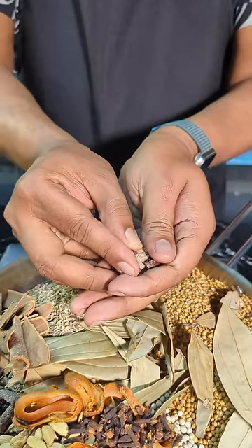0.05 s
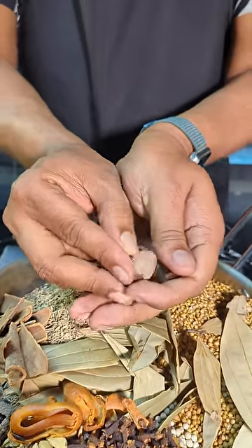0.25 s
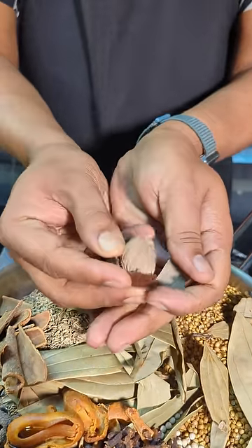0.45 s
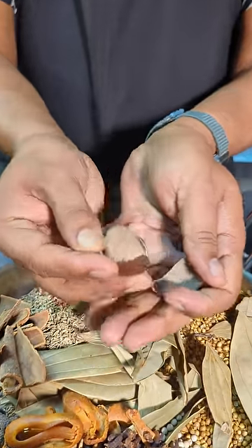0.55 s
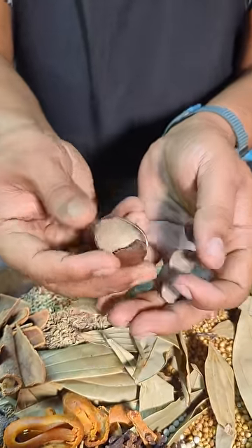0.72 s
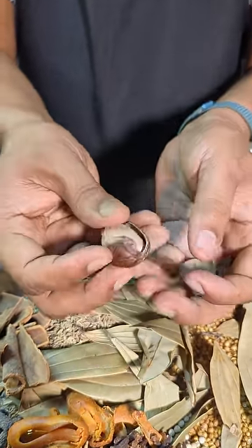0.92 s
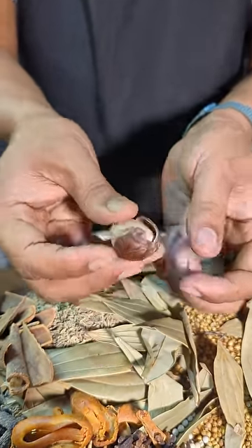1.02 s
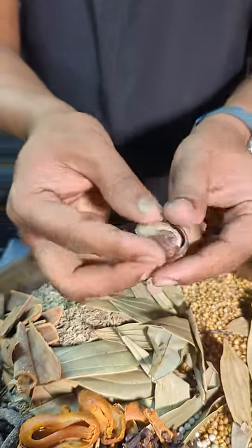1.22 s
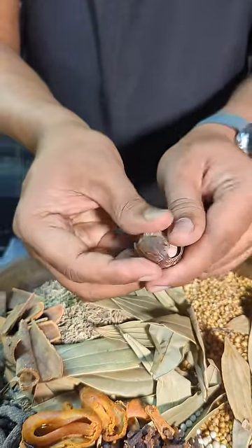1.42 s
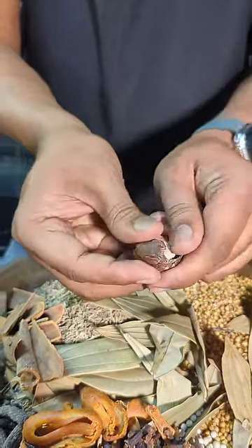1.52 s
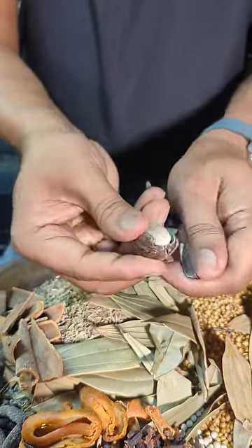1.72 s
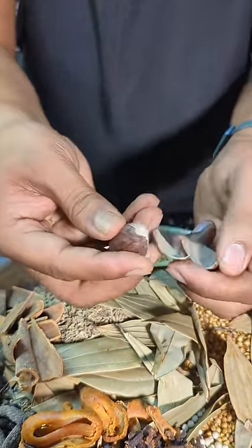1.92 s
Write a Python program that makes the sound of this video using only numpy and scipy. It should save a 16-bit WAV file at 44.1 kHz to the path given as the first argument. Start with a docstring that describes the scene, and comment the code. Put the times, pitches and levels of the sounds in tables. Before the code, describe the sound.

Fingers snap the hard shell off a nutmeg, close up, over a faint machine hum.

```python
"""Fingers break the brittle shell off a nutmeg, close to a stereo microphone in a quiet room.
Each fracture is an impulse with a short run of micro-cracks that excites the resonances of the shell.
Between fractures the pieces rub, nails tick and fingers bump. The room reverberates briefly,
the first break jolts the right microphone port, and a machine hums and rumbles behind."""
import sys
import numpy as np
from scipy import signal
from scipy.fft import rfft, irfft, next_fast_len
from scipy.io import wavfile

SR = 44100
rng = np.random.default_rng(int(sys.argv[2]) if len(sys.argv) > 2 else 0)


def materialize(psi):
    """Save the field psi as 16-bit PCM at rate SR to the path in sys.argv[1].

    A 1-D psi becomes a single channel; in a 2-D psi each row is a channel.
    """
    bounded = np.clip(np.atleast_2d(psi).T, -1, 1)
    quanta = np.round(bounded * 32767).astype(np.int16)
    wavfile.write(sys.argv[1], SR, quanta)


N = 85995

# spectrum of the air noise: f/Hz, relative level/dB
AIR_SPECTRUM = [(120, 1), (200, 2.5), (245, -6.5), (360, -8), (740, -17), (1190, -18), (1560, -13.5),
                (1800, -19), (1980, -8), (2250, -19), (3460, -20.5), (4120, -23.5), (6140, -26.5),
                (7300, -25.5), (9000, -32)]
# its treble roll-off: f/Hz, gain/dB
AIR_ROLL_OFF = [(8500, 1), (10500, 1), (12500, -5), (16000, -10)]
# resonances of the machine: f/Hz, half width/Hz, level/dB
MACHINE_MODES = [(1551, 99, -59), (1980, 29, -63), (7330, 580, -63.5)]
# partials of the hum: f/Hz, level/dB
HUM_PARTIALS = [(49.8, -36), (149.4, -49), (249.7, -60.5), (299.8, -63.5)]
# envelope of air noise, machine resonances and hum: t/s, gain/dB
AIR_ENVELOPE = [(0, 1), (.23, 0.5), (.27, -9), (.5, -0.5), (1.48, 2), (1.7, -12.5), (1.95, 1)]
# spectrum of the rumble: f/Hz, relative level/dB
RUMBLE_SPECTRUM = [(10, -3), (25, 3.5), (38, 2), (52, 1.5), (62, -13.5), (100, -11.5), (185, -14.5),
                   (240, -30.5), (420, -40), (1000, -53), (4000, -100)]
# envelope of the rumble: t/s, level/dB
RUMBLE_ENVELOPE = [(0, -35), (.7, -34.5), (.8, -30.5), (1.1, -29), (1.45, -33.5), (1.64, -38), (1.7, -52),
                   (1.85, -33.5), (1.95, -46)]
# faint whistles: onset t/s, duration/s, f/Hz, level/dB
WHISTLE_NOTES = [(0.037, 0.0074, 3450, -47), (0.09, .08, 3330, -56), (0.461, 0.17, 2960, -52.5)]
# balance of the background: f/Hz, left minus right/dB
BACKGROUND_BALANCE = [(50, -1.5), (1000, -0.5), (3000, -2.5), (9000, 3.5), (15000, -2)]
# likeness of noise at the two ports: f/Hz, correlation
COHERENCE = [(30, 0.97), (150, 1), (400, 0.86), (1000, 0.72), (2000, 0.41), (5000, 0), (15000, 0.0094)]
# reverberation time: f/Hz, T60/s
ROOM_DECAY = [(300, 0.61), (3000, 0.49), (8000, 0.47), (15000, 0.28)]
# initial spectrum of the reverberation: f/Hz, relative level/dB
ROOM_SPECTRUM = [(300, 12), (1500, 0.5), (3000, 1.5), (4500, 1), (6500, -2.5), (8800, 1), (12000, -6),
                 (16000, 7)]
# air pushed onto the right port: onset t/s, level/dB, time constant/s, corner f/Hz
PORT_PUFF = (-0.53, -36.5, 0.38, 370)
# jolt of the right port: t/s, amplitude, f/Hz, time constant/s
PORT_KNOCK = (.2452, 0.88, 6.93, 0.11)
# soft contacts of fingers and nut: t/s, level/dB
FINGER_BUMPS = [(.254, -31.5), (.301, -39), (0.323, -41), (0.345, -37.5), (0.934, -34.5), (1.329, -48)]
# sliding strokes: centre t/s, standard deviation/s, level/dB
RUB_STROKES = [(0.937, 0.0066, -46), (1.142, 0.0038, -34.5), (1.353, 0.029, -50), (1.423, 0.009, -37.5),
               (1.525, 0.0082, -38.5), (1.666, 0.017, -39.5), (1.754, 0.022, -35)]
# spectrum of the friction: f/Hz, relative level/dB
RUB_SPECTRUM = [(200, -35), (900, -3.5), (2500, -6.5), (5500, 2), (10000, -4), (13000, -14), (16000, -15)]
# nail contacts: t/s, level/dB
NAIL_TICKS = [(.852, -19), (0.867, -18.5), (0.9342, -18), (0.958, -14), (0.9953, -17), (1.663, -6),
              (1.7703, -29), (1.838, -19)]
# response of the shell to a nail: f/Hz, gain/dB
TICK_SPECTRUM = [(300, -5), (1500, -19), (5000, -3.5), (9000, -2), (14500, -8.5), (17000, -12)]
# resonances that outlast the first break: f/Hz, level/dB, T60/s
LINGERING_MODES = [(2753, -41, 0.21), (2932, -42.5, 0.24), (3420, -43, 0.23), (4560, -46, 0.3),
                   (5700, -42, 0.3), (7410, -38, 0.4), (8050, -37, 0.35), (8600, -40, 0.31)]
# pings of cup-shaped pieces: t/s, f/Hz, level/dB
CUP_PINGS = [(0.2365, 3490, -20), (1.2765, 4160, -28), (1.6076, 1690, -34), (1.6758, 1560, -24.5),
             (1.6994, 1537, -21.5)]
# fractures: t/s, time constant/ms, lower ring f/Hz, lift/dB, upper ring f/Hz, lift/dB,
# band level/dB (body, middle, edge, bright, top), room gain/dB; lifts are limited to 0..MAX_LIFT_DB
FRACTURES = [ (0.2364, 0.48, 2700, 19, 3370, 9.5, -13, 9, 11, 17, 3, 2),
             (0.2428, 0.54, 7500, 17, 7800, 19, 6, 5.5, -9, -6, 11, 0),
             (0.245, 1.4, 2830, 27.5, 4800, 6, 5.5, 1.5, 13.5, 12, 3, 8),
             (0.4236, 0.5, 2550, 15, 5030, 10, -14, -20, -27, -26, -44, -10),
             (0.4669, 2.2, 1647, 13, 4630, 6.5, -10, -10, -7, -5, -12, 5.5),
             (0.5743, 0.19, 2310, 13, 2900, 15, -10.5, -18, -16, -18.5, -25, 11),
             (.7236, 0.78, 1790, 7, 2930, 13.5, -4.5, -12.5, -15, -29, -41, -18),
             (1.1114, 1.3, 2350, 3, 5100, 11.5, -1.5, -9, -19, -25, -39, 4),
             (1.1312, 1.2, 4200, 16.5, 4800, 6, 2.5, 0, 7.5, 0.5, -4.5, 1.5),
             (1.2764, 0.32, 3130, 4.5, 4320, 10, -18, -0.5, 4.5, 0.5, -19, -1),
             (1.2806, 1.7, 4900, 0, 7200, 11, -15, -2.5, -2.5, -7, -11, 2.5),
             (1.3269, 0.18, 2240, 6, 5260, 7, 4, -2.5, -8.5, -24, -44, -9),
             (1.402, 0.45, 3270, -4, 5300, 17, -15, -15, -11, -16, -32.5, 4),
             (1.4531, 3.5, 5140, 10, 7040, -2, -7, -17.5, -1.5, -1.5, -13, -4),
             (1.5035, 3.7, 7160, 12, 10200, 8, -14, -10.5, -4.5, 1, -29, 11),
             (1.5059, 0.6, 10170, 5, 10960, 7, -0.5, -7.5, 10, 13, 8, -9),
             (1.5678, 2.3, 5800, -1, 7000, 10, -8.5, -23, -2, 0, -7, 1),
             (1.5698, 0.32, 6960, 15, 9800, -5, -29, -4, 0, 8.5, -19, -4.5),
             (1.5987, 0.39, 4160, 10, 9900, 10, -0.5, 4, 14.5, 10.5, 5.5, 1),
             (1.607, 1.2, 3520, 10, 10100, -2, 4.5, 4.5, 8, 17.5, 8, 0),
             (1.675, 0.4, 5400, 5.5, 7600, -5.5, 8, 6.5, 18.5, 16, 7, -4),
             (1.6977, 2.2, 8600, 14, 11800, 13, -27, -30, 1, 2, -7, 11.5),
             (1.699, 1.8, 2420, 7.5, 4700, 4.5, 8, 6.5, 12.5, 11.5, 2, 2)]
# balance of the shell and its reverberation: f/Hz, left minus right/dB
SHELL_BALANCE = [(300, 3), (1500, -4), (3200, -4.5), (5500, -1.5), (7500, 1.5), (8800, 3.5), (9800, 17.5),
                 (11800, -11.5), (15000, -1)]

MAX_LIFT_DB, RING_WIDTH = 15, 0.029  # shell resonances: greatest lift, relative half width


def amp(db):
    """Amplitude ratio of a level."""
    return 10 ** (np.asarray(db) / 20)


def unit(x):
    """Normalisation to rms 1."""
    return x / np.sqrt(np.mean(x ** 2) + 1e-20)


def along(points, hz):
    """Interpolation on a logarithmic frequency axis."""
    f, v = np.transpose(points)
    return np.interp(np.log(hz + 1), np.log(f + 1), v)


def envelope(points):
    """Amplitude at each sample, interpolated in dB."""
    return amp(np.interp(np.arange(N) / SR, *np.transpose(points)))


def filtered(x, response):
    """Linear filtering: the spectrum times a frequency response."""
    m = next_fast_len(N + SR // 2)
    return irfft(rfft(x, m) * response(np.fft.rfftfreq(m, 1 / SR)), m)[..., :N]


def minimum_phase(gain_db, size=2048):
    """Causal impulse response of a gain curve, by folding the cepstrum."""
    cepstrum = irfft(np.log(amp(gain_db(np.fft.rfftfreq(size, 1 / SR)))))
    cepstrum[1:size // 2] *= 2
    cepstrum[size // 2 + 1:] = 0
    return irfft(np.exp(rfft(cepstrum)))[None]


def add(track, s, x):
    """Superposition of x on the track at time s."""
    i = int(round(s * SR))
    track[:, i:i + x.shape[1]] += x[:, :N - i]


def panned(x, balance):
    """Level difference between the ports at constant total power."""
    def gains(hz):
        g = amp(along(balance, hz) * np.array([[.5], [-.5]]))
        return g / np.sqrt(np.mean(g ** 2, axis=0))
    return filtered(x, gains)


def noise(gain):
    """Partly coherent stereo noise of rms 1, nearly mono in the bass."""
    def response(hz):
        angle = np.arccos(np.clip(along(COHERENCE, hz), -1, 1)) / 2
        return gain(hz) * [np.cos(angle), np.sin(angle)]
    mid, side = filtered(rng.standard_normal((2, N)), response)
    return unit(np.array([mid + side, mid - side]))


def band(centre_hz, half_width_hz):
    """Noise in one narrow resonance."""
    return noise(lambda hz: 1 / (1 + ((hz - centre_hz) / half_width_hz) ** 2))


def background():
    """A machine's tonal hum, resonances and rumble superpose on broadband air noise and faint whistles."""
    t = np.arange(N) / SR
    air_gain = lambda hz: amp(along(AIR_SPECTRUM, hz) + along(AIR_ROLL_OFF, hz))
    air = amp(-49.5) * noise(lambda hz: air_gain(hz) / (1 + (180 / (hz + 1)) ** 4))
    modes = sum(amp(db) * band(hz, width) for hz, width, db in MACHINE_MODES)
    hum = sum(amp(db) * np.sqrt(2) * np.sin(2 * np.pi * (hz * t + rng.random()))
              for hz, db in HUM_PARTIALS)
    rumble = envelope(RUMBLE_ENVELOPE) * noise(lambda hz: amp(along(RUMBLE_SPECTRUM, hz)))
    whistles = sum(amp(db) * band(hz, half_width_hz=250) / (1 + ((t - s) / length * 2 - 1) ** 10)
                   for s, length, hz, db in WHISTLE_NOTES)
    return panned(envelope(AIR_ENVELOPE) * (air + modes + hum) + rumble + whistles, BACKGROUND_BALANCE)


def room(x, tail_db=-12.5, early_db=-16, early_decay_s=0.0084):
    """Early reflections from hands and tray, then diffuse reverberation whose treble decays fastest."""
    hz, age, spectra = signal.stft(rng.standard_normal((2, SR // 2)), SR, nperseg=256)
    decay_db = along(ROOM_SPECTRUM, hz)[:, None] - 60 * age / along(ROOM_DECAY, hz)[:, None]
    tail = signal.istft(spectra * amp(decay_db), SR, nperseg=256)[1]
    t = np.arange(tail.shape[1]) / SR
    tail = tail * (t > .005)
    tail *= amp(tail_db) / np.linalg.norm(tail[0])
    early = rng.standard_normal(tail.shape) * np.exp(-t / early_decay_s) * (t > .002)
    early *= amp(early_db) / np.linalg.norm(early[0])
    return signal.fftconvolve(x, early + tail, axes=1)


def knock():
    """The jolt of the first break sets the right port into a damped infrasonic oscillation."""
    s, size, hz, decay_s = PORT_KNOCK
    t = np.maximum(np.arange(N) / SR - s, 0)
    phase = 2 * np.pi * hz * t + 1.46 * (1 - np.exp(-t / .012))
    return np.array([np.zeros(N), -size * np.sin(phase) * np.exp(-t / decay_s)])


def puff():
    """Air pushed onto the right port gives low-pass noise, decaying exponentially from the outset."""
    s, db, decay_s, corner_hz = PORT_PUFF
    t = np.arange(N) / SR - s
    pressure = noise(lambda hz: 1 / (1 + (hz / corner_hz) ** 2))[1]
    return np.array([np.zeros(N), amp(db) * np.exp(-t / decay_s) * pressure])


def bumps(decay_s=0.0083, corner_hz=414, left_db=-25):
    """Damping by flesh reduces finger contacts to short dull pats."""
    t = np.arange(N) / SR
    pats = sum(amp(db) * (t > s) * np.exp(-abs(t - s) / decay_s) for s, db in FINGER_BUMPS)
    dull = noise(lambda hz: hz / (hz + 200) / (1 + (hz / corner_hz) ** 3.2))
    return pats * dull * np.array([[amp(left_db)], [1]])


def rubs(grains_per_s=1300):
    """Sliding friction between pieces is shot noise: dense, tiny impulses at random times."""
    t = np.arange(N) / SR
    contacts = rng.random(N) < grains_per_s / SR
    grains = contacts * (rng.standard_normal(N) + 0.87 * rng.standard_normal((2, N)))
    strokes = sum(amp(db) * np.exp(-.5 * ((t - s) / sigma) ** 2) for s, sigma, db in RUB_STROKES)
    return strokes * unit(filtered(grains, lambda hz: amp(along(RUB_SPECTRUM, hz))))


def flattened(x):
    """Whitening: an approximate inverse filter evens out the spectrum of x."""
    inverse_db = lambda hz: -9 * np.log10(abs(rfft(x, 2 * (len(hz) - 1))) + 1e-3)
    return np.convolve(x, minimum_phase(inverse_db)[0])[:len(x)]


def burst(decay_ms, snap=2.58, stereo_spread=0.89, size=512):
    """Broadband excitation: a snap and a decaying run of micro-cracks, of energy 1 in each port."""
    ms = np.arange(size) / SR * 1000
    run = rng.standard_normal(size) + stereo_spread * rng.standard_normal((2, size))
    run *= np.exp(-ms / decay_ms)
    run[:, 0] = snap
    run = np.array([flattened(port) for port in run])
    return run / np.linalg.norm(run, axis=1, keepdims=True)


def ticks():
    """Nails catching on its edge excite the shell's impulse response."""
    out = np.zeros((2, N))
    shell = minimum_phase(lambda hz: along(TICK_SPECTRUM, hz))
    for s, db in NAIL_TICKS:
        add(out, s, amp(db) * signal.fftconvolve(burst(decay_ms=1.0), shell, axes=1))
    return out


def after_ring(onset_s=0.2452):
    """Lightly damped resonances ring on after the first break."""
    t = np.arange(N) / SR - onset_s
    return (t > 0) * sum(amp(db - 60 * abs(t) / t60) * band(hz, half_width_hz=20)
                         for hz, db, t60 in LINGERING_MODES)


def cup_pings(t60_s=0.022):
    """Free vibration: hard snaps make the cup-shaped pieces ping briefly, like wood."""
    out, t = np.zeros((2, N)), np.arange(SR // 10) / SR
    for s, hz, db in CUP_PINGS:
        add(out, s, (np.sin(2 * np.pi * hz * t) * amp(db - 60 * t / t60_s))[None])
    return out


def resonance(hz, centre_hz, lift_db):
    """Gain in dB of one shell mode, a Lorentzian peak in power."""
    lift = amp(np.clip(lift_db, 0, MAX_LIFT_DB))
    return 10 * np.log10(1 + (lift ** 2 - 1) / (1 + ((hz / centre_hz - 1) / RING_WIDTH) ** 2))


def cracks():
    """Each brittle fracture excites two modes of the breaking piece; its broad snap excites the room."""
    direct, reverberant = np.zeros((2, 2, N))
    for s, decay_ms, low_hz, low_db, high_hz, high_db, *bands_db, room_db in FRACTURES:
        body, middle, edge, bright, top = bands_db
        spectrum = [(60, body - 55), (350, body - 16.5), (900, body - 10), (1250, body - 8),
                    (1550, body), (2200, body), (2900, middle), (4600, middle + 5), (5600, edge),
                    (7800, edge), (9700, bright), (11200, bright), (12800, top), (16000, top - 7.5)]
        snap = signal.fftconvolve(burst(decay_ms), minimum_phase(lambda hz: along(spectrum, hz)), axes=1)
        rings = minimum_phase(lambda hz: resonance(hz, low_hz, low_db) + resonance(hz, high_hz, high_db))
        add(direct, s, signal.fftconvolve(snap, rings, axes=1))
        add(reverberant, s, amp(room_db) * room(snap))
    return direct, reverberant


def scene():
    """The shell lies a little to the right, so its direct sound reaches the left port later."""
    direct, reverberant = cracks()
    lag_s = 4.7e-5
    delays = lambda hz: np.exp(1j * np.pi * hz * lag_s * np.array([[-1], [1]]))
    near = filtered(direct + cup_pings() + ticks() + rubs(), delays)
    shell = panned(near + reverberant + after_ring(), SHELL_BALANCE)
    return shell + knock() + puff() + bumps() + background()


def record(dry):
    """Saturation rounds off the loudest snaps; a steep low-pass limits the bandwidth."""
    ceiling, cutoff_hz = 1.05, 16200
    clipped = dry / (1 + (dry / ceiling) ** 4) ** (1 / 4)
    return filtered(clipped, lambda hz: 1 / (1 + (hz / cutoff_hz) ** 120))


dry = scene()
out = record(dry)
materialize(out)
```